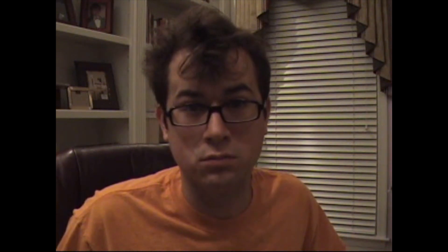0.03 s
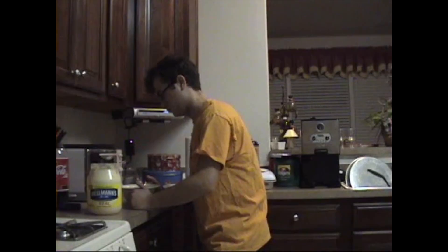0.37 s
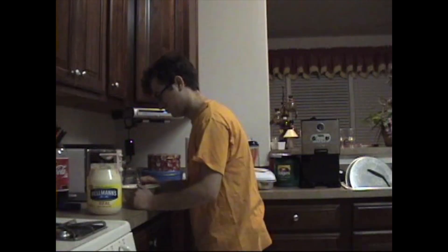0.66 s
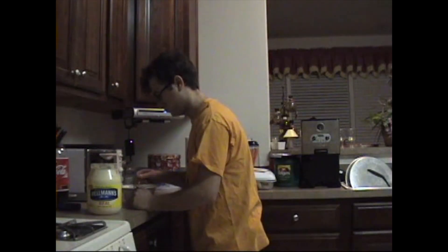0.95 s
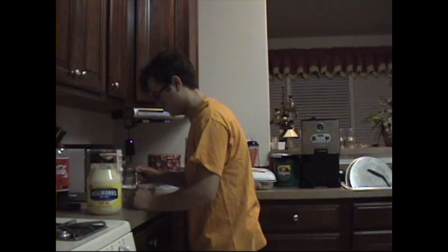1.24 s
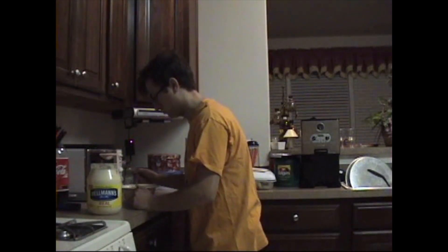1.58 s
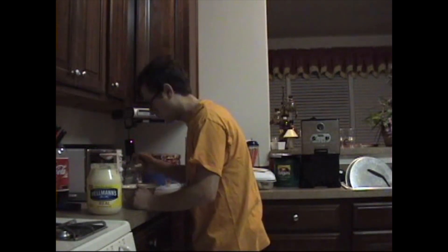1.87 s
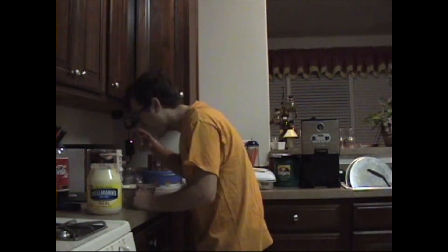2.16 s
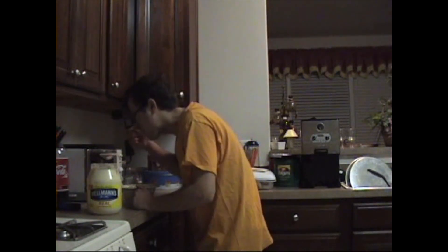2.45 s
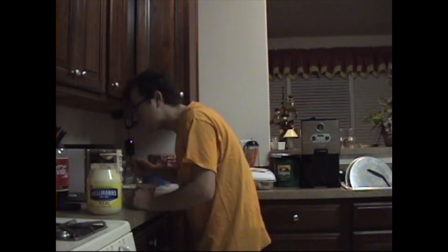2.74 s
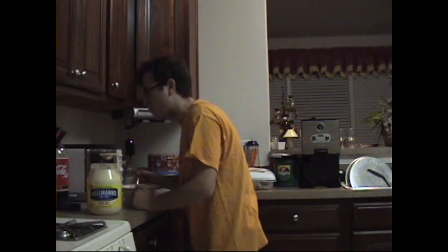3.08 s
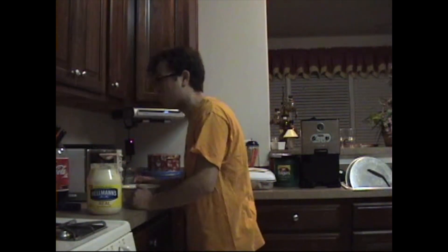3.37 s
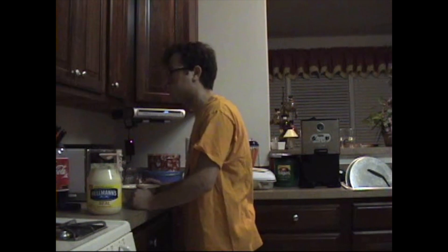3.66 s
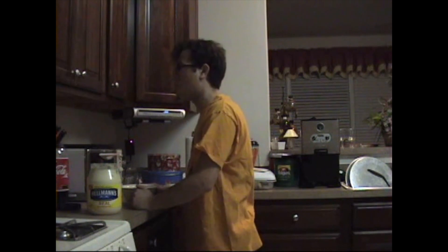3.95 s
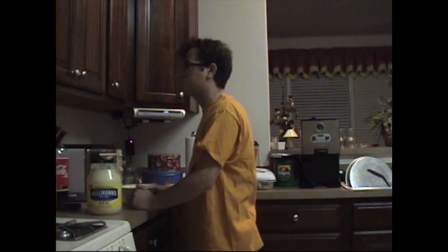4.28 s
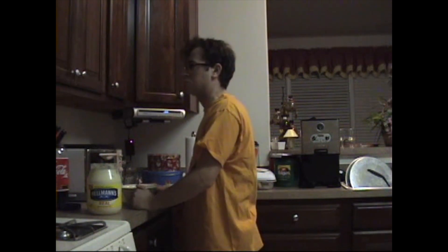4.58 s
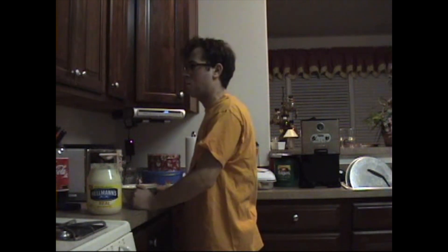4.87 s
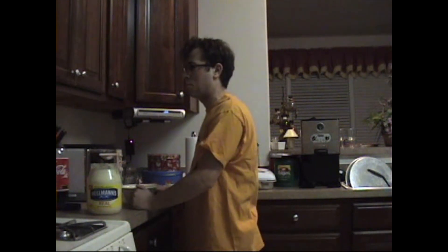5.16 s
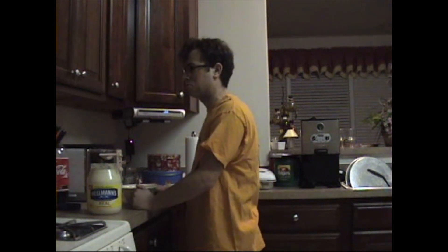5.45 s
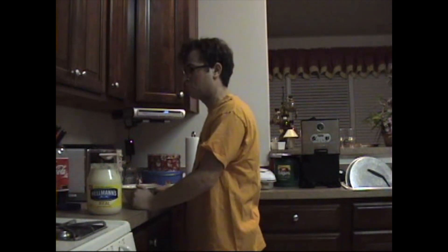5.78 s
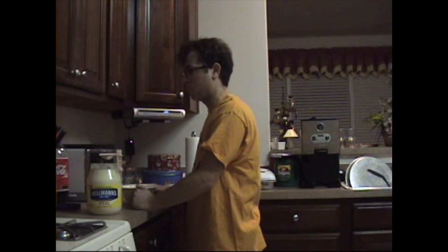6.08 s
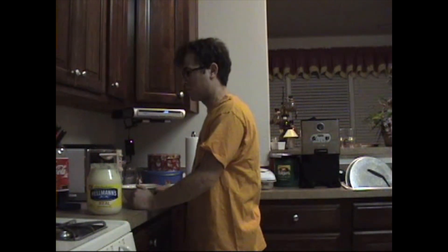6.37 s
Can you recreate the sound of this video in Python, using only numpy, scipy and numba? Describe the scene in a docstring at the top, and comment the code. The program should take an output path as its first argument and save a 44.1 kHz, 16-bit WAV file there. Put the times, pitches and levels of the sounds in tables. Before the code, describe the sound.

Someone bumps a bowl down, stirs and tastes with a spoon, lets it clink against the china and quietly smacks their lips.

```python
"""A small kitchen, close to the counter. A china bowl is bumped down with a hollow, booming thud.
A metal spoon sticks and slips through the mixture, squeaking on the glaze. It slides between the lips,
clicks on the teeth, scrapes in the bowl again and drops rattling against the rim.
Lips smack and something ticks once. Behind it all, a soft room rumble with an appliance drone
swells after each sound, as a noise suppressor opens and slowly closes."""
import sys
import numpy as np
from scipy import signal
from scipy.fft import rfft, irfft
from scipy.io import wavfile
from scipy.ndimage import uniform_filter1d
from numba import njit

SR = 44100
rng = np.random.default_rng(int(sys.argv[2]) if len(sys.argv) > 2 else 0)


def to_wav(s):
    """Save 16-bit WAV."""
    ch = np.atleast_2d(s).T  # columns
    pcm = np.round(np.clip(ch, -1, 1) * 32767)  # PCM
    wavfile.write(sys.argv[1], SR, pcm.astype(np.int16))


N = 287708
TIME = np.arange(N) / SR
SIDE = np.array([[1], [-1]])  # stereo width: added on the left, subtracted on the right

# two faint, dull thumps where the scene changes from the still, humming air, then the bowl's blows on the
# counter: # (time [s], relative level [dB])
DULL_BUMPS = [(0.315, -49), (0.345, -49), (0.9101, -6), (0.9125, 1.5), (0.9165, -2), (0.923, -2),
              (0.940, -20)]
# cupboard boom, longest in the hollow middle: (low edge [Hz], high edge [Hz], relative level [dB], t60 [s])
CUPBOARD_BOOM = [(130, 420, -26, .37), (430, 640, -26, .42), (680, 1060, -24.5, .31),
                 (1100, 1900, -21, .22)]
# EQ curve of the thud: (frequency [Hz], relative gain [dB])
THUD_EQ = [(40, -29), (100, -17), (155, -4.5), (240, -6), (400, 3), (520, 0), (720, -.5), (1000, -2.5),
           (1300, -13.5), (1800, -17.5), (2200, -27), (2850, -28), (3300, -55), (6000, -76)]
# low, hollow tones ringing in the thud: (frequency [Hz], relative level [dB], t60 [s])
THUD_TONES = [(149, -2.5, .27), (285, -11, .32), (316, -5, .33), (392, 2.5, .31), (418, -6, .32),
              (518, -7, .35), (556, -3, .42), (690, -6, .25), (786, -15, .3), (843, -11, .3),
              (929, -10, .31), (985, -12, .31), (1055, -16, .31)]
def thuds():
    """Two faint thumps as the scene changes, then the bowl rocks onto its foot: dull blows, a boom and low,
    hollow tones."""
    tones_start_s, at_rest_s, swell_cycles = 0.9135, 1.08, 6
    times, db = np.transpose(DULL_BUMPS)
    blows = bursts(times, db - 10, t60=.028) * rng.standard_normal(N)
    boom = sum(band(bursts(times, db + boom_db, t60) * rng.standard_normal(N), low, high, order=6)
               for low, high, boom_db, t60 in CUPBOARD_BOOM)
    out, t = colour(blows + boom, THUD_EQ), TIME[:SR]
    for tone in THUD_TONES:
        swell = 1 - fade(t, t60=swell_cycles / tone[0])
        add(out, tones_start_s, amp(-23.7) * ringing([tone], t) * swell)
    choke = amp(-170 * np.maximum(TIME - at_rest_s, 0))
    return band(out * choke, 62, 3000, order=5)


STROKE_ATTACK_S = .022
# spoon strokes: (start [s], length [s], level [dB], edge bite on china [dB], squeak [Hz] or 0 for none)
SPOON_STROKES = [(0.797, 0.043, -66.5, 0.5, 0), (0.915, 0.023, -65, -1, 0), (0.98, .1, -73, -10, 0),
                 (1.121, .04, -57, -4, 0), (1.215, .07, -56, -3.5, 0), (1.297, .05, -51.5, -14, 0),
                 (1.355, .065, -50, -14, 6478), (1.45, .05, -50, -4, 5901), (1.54, .04, -65, 1, 6480),
                 (1.585, .026, -51, -21, 8100), (1.63, .04, -60, -20, 11000),
                 (1.673, .055, -46.5, -15, 8297), (1.747, 0.022, -51.5, -3, 6398), (1.81, .02, -68, 1, 0),
                 (1.90, .025, -66.5, -5, 0), (1.96, .04, -76, 6, 0), (2.16, .05, -77, 1, 0),
                 (2.57, .025, -51, -2, 0), (3.115, .045, -35.5, -3, 0), (3.18, .04, -48, -5, 0),
                 (3.275, .1, -49.5, -5, 8799.5), (3.40, .06, -52, 8, 0), (3.556, 0.03, -75, 14, 6300)]
# EQ curve of the scraping hiss: (frequency [Hz], relative gain [dB])
SCRAPE_EQ = [(600, -16), (1400, -12), (2500, -12.5), (3600, -16), (4500, -11), (6000, -1), (8300, 1.5),
             (10500, -5.5), (12500, -10), (14000, -21)]
def spoon_scrape():
    """The spoon sticks and slips over the glaze; the slips sing in spoon and bowl."""
    glide_bite_db = -28  # a stroke with this little bite glides flat and adds a fine, high hiss
    flat_power, edge_power, glide_power = 0, 0, 0
    for start, length, db, bite_db, _ in SPOON_STROKES:
        power = (amp(db) * stroke_pressure(start, length)) ** 2
        flat_power += power
        edge_power += power * amp(bite_db) ** 2
        glide_power += power * np.clip(bite_db / glide_bite_db, 0, 1) ** 3
    chatter = amp(1.4 * flutter(N, rate_hz=130))
    slips = grit(spread_db=3) * chatter
    edge = slips * np.sqrt(edge_power)  # only the bare edge reaches the china
    hiss = colour(slips * np.sqrt(flat_power), SCRAPE_EQ)
    bite = colour(edge, [(200, -23.5), (1200, -15), (2400, -10.5), (4200, -2.5), (6000, 5),
                         (9000, -13.5), (14000, -28)])
    glide = amp(-1) * unit(band(slips, 7500, 12000, order=2)) * np.sqrt(glide_power)
    rasp = moving_contact(hiss + bite + glide, patchy_db=3.6)
    steel = resonate(hiss, SPOON_MODES, damping_t60=.18)
    china = resonate(band(edge, 2600, 14000, order=2), BOWL_MODES, damping_t60=.23)
    return band(amp(-1) * rasp + amp(-15.5) * steel + amp(-12.5) * china, 300, 13000, order=2)


def stroke_pressure(start, length):
    """One stroke presses in, holds and lets go; the spoon drags on faintly through the mixture."""
    attack = np.clip((TIME - start) / STROKE_ATTACK_S, 0, 1)
    after = np.maximum(TIME - start - length, 0)
    drag = amp(-24.5) * fade(after, t60=.65)
    return attack * np.maximum(fade(after, t60=.22), drag)


def moving_contact(x, patchy_db):
    """As the contact point moves, narrow resonances come and go for some tens of milliseconds."""
    *_, frames = signal.stft(x, nperseg=512)
    patches = uniform_filter1d(rng.standard_normal(frames.shape), size=3, axis=0)
    patches = uniform_filter1d(patches, size=12, axis=1)
    return signal.istft(frames * unit(amp(patchy_db * unit(patches))))[1][:N]


def spoon_squeaks():
    """In some strokes the slips lock into a thin whistle that swells and fades."""
    out = np.zeros(N)
    for start, length, db, bite_db, hz in SPOON_STROKES:
        if hz:
            size = int((length + STROKE_ATTACK_S) * SR)
            strength = amp(db + 1.5) * np.hypot(1, amp(bite_db))
            whistle = wavering(hz, spread_hz=150, size=SR // 4)[:size]
            add(out, start, strength * np.hanning(size) * whistle)
    return out


# the spoon touches the bowl: (time [s], ring level [dB], crack level [dB])
BOWL_TOUCHES = [(0.562, -85, -76), (1.484, -53, -68), (1.850, -71, -60), (1.902, -74, -68),
                (2.123, -72, -69), (3.128, -44, -54), (3.143, -40, -49), (3.205, -54, -66),
                (3.384, -34, -56.5), (3.391, -27, -43), (3.395, -21, -29)]
# china modes, with a beating cluster near 3.6 kHz: (frequency [Hz], relative level [dB], t60 [s])
BOWL_MODES = [(1345, -16, .27), (1373, -5, .29), (3583, -10, .18), (3623, 1, .24), (3653.6, -10, .25),
              (3711, -12, .16), (4194, -16, .25), (5835, -9, .22), (6305, -13, .33), (8660, -13, .17),
              (9382, -18, .21), (10455, -14, .14), (11942, -15, .14), (13242, -14, .11), (1915, -25, .3),
              (2600, -25, .3), (4950, -22, .22), (6400, -16, .22), (7740, -22, .18), (8540, -16, .17),
              (11200, -23, .15)]
def bowl_clinks():
    """The china rings as the spoon touches it, then drops on the rim."""
    contacts = BOWL_TOUCHES + rim_bounces(count=6)
    china = strike(contacts, BOWL_MODES, crack_t60=.11, push_s=.0025, buzz=.45, sing_db=-4)
    return china + counter_knock(contacts)


def rim_bounces(count):
    """The dropped spoon rattles, each bounce weaker and after a longer gap than the last."""
    drop_s, first_gap_s, gap_growth = 3.407, .0105, 1.27
    bounce = np.arange(count)
    gaps = first_gap_s * gap_growth ** bounce
    ring_db, crack_db = -19 - 3.1 * bounce, -27.5 - 5 * bounce
    return list(zip(drop_s + np.cumsum(gaps) - gaps, ring_db, crack_db))


# EQ curve of the knock under the bowl: (frequency [Hz], relative gain [dB])
KNOCK_EQ = [(150, -25), (450, 0), (850, -17), (2000, -35)]
def counter_knock(contacts):
    """Hard drops of the spoon push the bowl against the counter; light touches hardly do."""
    times, _, crack_db = np.transpose(contacts)
    knock_db = crack_db - 11 + .8 * (crack_db - crack_db.max())
    return colour(rng.standard_normal(N) * bursts(times, knock_db, t60=.12), KNOCK_EQ)


# the spoon catches: (time [s], ring level [dB], crack level [dB])
SPOON_CATCHES = [(1.592, -70, -51), (2.493, -68, -60), (2.582, -41, -51), (2.592, -38.5, -47),
                 (3.117, -40, -58), (3.136, -36, -51), (3.163, -41, -56)]
# steel spoon modes: (frequency [Hz], relative level [dB], t60 [s])
SPOON_MODES = [(2950, -11, .06), (3600, -4, .06), (3850, -6, .06), (4180, -.5, 0.115), (4750, -11, .06),
               (5480, -17, 0.11), (6470, -5.5, 0.16), (7620, -6.5, 0.17), (7850, -10.5, 0.14),
               (9300, -13, .18), (10950, -11, 0.2), (11820, -16, 0.1)]
def spoon_taps():
    """The steel gives a short, bright ring as it catches on bowl or teeth."""
    return strike(SPOON_CATCHES, SPOON_MODES, crack_t60=.028, push_s=.004, buzz=.45, sing_db=-6)


# EQ curve of the hard steel-on-china transient: (frequency [Hz], relative gain [dB])
CRACK_EQ = [(150, -24), (850, -11), (1400, -1), (2400, 0), (4000, 0), (6300, -1), (9000, 2), (13000, -4),
            (15000, -18)]
def strike(contacts, modes, crack_t60, push_s, buzz, sing_db):
    """Each contact rasps and pushes the ring to a new level; the loose spoon buzzes on every mode."""
    times, ring_db, crack_db = np.transpose(contacts)
    out, t, middle_hz = np.zeros(N), TIME[:SR // 3], 3600
    chatter = flutter((len(modes), 2 * len(t)), rate_hz=200)
    for at, gap, db in zip(times, np.diff(times, append=N / SR), ring_db):
        held = np.minimum(t / push_s, 1) * np.clip(1 - (t - gap) / push_s, 0, 1)  # until the next contact
        size, first = min(np.count_nonzero(held) + 1, len(t)), int(at * SR)
        for (hz, mode_db, t60), shake in zip(modes, chatter):
            # glancing touches mostly ring the modes of the middle range
            octaves = np.log2(hz / middle_hz)
            glancing_db = (db - ring_db.max()) * max(.2 * octaves, -.4 * octaves)
            rough = 1 + buzz * (hz / middle_hz) ** .4 * shake[first % len(t):][:size]
            ring = ringing([(hz, db + mode_db + glancing_db, t60)], t[:size], start=first / SR)
            add(out, at, held[:size] * rough * ring)
    rasp = grit(spread_db=3) * bursts(times, crack_db, crack_t60)
    singing = amp(sing_db) * resonate(band(rasp, 4000, 15000, order=1), modes, damping_t60=.03)
    return band(out + colour(rasp, CRACK_EQ) + singing, 250, 16000, order=2)


# close, beating modes of spoon on teeth: (frequency [Hz], relative level [dB], t60 [s])
TEETH_MODES = [(3245, -5, .13), (3320, -2, .18), (3375, -5, .17), (3410, 0, .19), (3480, -7, .14),
               (8400, -8, .1), (9400, -8, .12), (11050, -5, .12)]
def teeth_click():
    """The spoon clicks on the teeth: a bright crack and a rough, beating ring."""
    out, t = np.zeros(N), TIME[:SR // 4]
    attack = 1 - fade(t, t60=.014)  # the lips cushion the contact
    ring = ringing(TEETH_MODES, t) * attack
    buzz = 1 + .35 * flutter(len(t), rate_hz=300)
    crack = band(grit(spread_db=2)[:len(t)] * fade(t, t60=.05) * attack, 5500, 12500, order=2)
    add(out, at=2.3935, sound=amp(-31.5) * buzz * ring / np.abs(ring).max() + amp(-31) * crack)
    return out


# pulls of the spoon between the lips: (start [s], swell [s], level [dB])
LIP_PULLS = [(2.33, .032, -53), (2.368, .012, -52), (2.392, .012, -51), (2.43, .035, -56),
             (2.484, .012, -56), (2.53, .04, -56.5)]
# EQ curve of the lip friction: (frequency [Hz], relative gain [dB])
SLIDE_EQ = [(120, -34), (500, -12), (1100, -2), (2000, -15), (5500, -12), (6700, 1), (9500, 0), (12500, -5),
            (14500, -17)]
def lip_slide():
    """Friction on the lips swells and sings in the spoon's upper modes; a thin whistle rises at first."""
    force = np.zeros(N)
    for start, swell, db in LIP_PULLS:
        release = fade(np.maximum(TIME - start - swell, 0), t60=.23)
        force += amp(db) * np.clip((TIME - start) / swell, 0, 1) * release
    slips = force * grit(spread_db=3) * amp(2.2 * flutter(N, rate_hz=130))
    singing = resonate(band(slips, 6600, 14000, order=3), SPOON_MODES, damping_t60=.1)
    out = colour(slips, SLIDE_EQ) + amp(-1) * singing
    t = TIME[:int(.052 * SR)]
    whistle = wavering(hz=7550 + 9000 * t, spread_hz=90, size=len(t))
    add(out, at=2.328, sound=amp(-49) * np.sqrt(np.hanning(len(t))) * whistle)
    return out


# lip and tongue smacks: (time [s], length [s], ring level [dB], mouth cavity [Hz], crackle level [dB])
LIP_SMACKS = [(3.592, .02, -45, 2260, -54), (3.594, 0, -52, 4230, -69), (4.187, 0, -45, 5746, -72),
              (4.19, 0, -60, 4600, -70), (4.264, .035, -42, 2255, -58), (4.27, .07, -80, 9000, -74),
              (4.320, .02, -42.5, 2187, -57), (4.35, .06, -56, 2173, -64), (5.0695, 0, -47, 5950, -62),
              (5.070, 0, -59, 2200, -68), (5.185, 0, -62, 5950, -74), (5.215, 0, -68, 8900, -67),
              (5.252, 0, -62, 7700, -69), (5.306, 0, -52, 9250, -54), (5.309, 0, -46, 5790, -58),
              (5.3095, 0, -52, 2170, -60), (5.33, .02, -62, 9400, -64), (5.356, 0, -50, 7420, -66),
              (5.356, 0, -50, 5800, -65), (5.373, 0, -47, 3320, -58), (5.375, .02, -60, 5790, -66),
              (5.374, .02, -58, 480, -58), (5.374, 0, -51, 7400, -72), (5.374, .02, -48, 2066, -53),
              (5.46, 0, -66, 2200, -67), (5.54, .03, -70, 3300, -71), (6.268, .06, -69, 2200, -72)]
def lip_smacks():
    """Runs of wet clicks: each rings the mouth cavity at a wavering pitch and crackles around it."""
    click_gap_s, scatter_db, max_clicks = .0137, .7, 8
    out, t = np.zeros(N), TIME[:SR // 2]
    attack = 1 - fade(t, t60=.008)
    ring = fade(t, t60=.048) * attack
    fizz = (fade(t, t60=.055) + amp(-21) * fade(t, t60=.7)) * attack  # a soft crackle trails each click
    grains = grit(spread_db=3.2)
    for start, length, db, hz, crackle_db in LIP_SMACKS:
        late, louder = rng.standard_normal((2, max_clicks))
        ring_power, crackle_power = np.zeros((2, N))
        for k in range(min(1 + int(length / click_gap_s), max_clicks)):
            after = max(click_gap_s * (k + .13 * late[k] * (k > 0)), 0)
            accent_db = scatter_db * louder[k]
            add(ring_power, after, (amp(db + accent_db) * ring) ** 2)
            add(crackle_power, after, (amp(crackle_db + accent_db) * fizz) ** 2)
        wet_grains = np.roll(grains, -int(start * SR))[:len(t)]
        crackle = unit(band(wet_grains, .45 * hz, min(1.65 * hz, 13000), order=4))
        cavity = wavering(hz, spread_hz=130, size=len(t))
        add(out, start, np.sqrt(ring_power[:len(t)]) * cavity + np.sqrt(crackle_power[:len(t)]) * crackle)
    return band(out, 320, 12500, order=3)


# EQ curve of the tick: (frequency [Hz], relative gain [dB])
TICK_EQ = [(150, -22), (400, -7.5), (1100, 2), (1500, -11), (2000, -28), (2900, -25), (3500, 1), (4600, -5),
           (7500, -10), (9500, -4), (12000, -18), (14000, -35)]
def tick(at=5.7222, db=-33):
    """One sharp tick of noise with a short, quieter tail."""
    envelope = bursts([at], [db], t60=.018) + bursts([at], [db - 14], t60=.09)
    return band(colour(rng.standard_normal(N) * envelope, TICK_EQ), 300, 12500, order=3)


# EQ curve of the room rumble: (frequency [Hz], relative gain [dB])
RUMBLE_EQ = [(18, -60), (30, -36.5), (53, -23), (85, -29.5), (107, -14), (139, -20.5), (158, -7.5),
             (240, -3), (267, -6), (437, -7.5), (645, -13), (1500, -21.5), (2630, -27.5), (8470, -38.5),
             (11300, -42.5), (15000, -56)]
# EQ curve of the stiller opening air: (frequency [Hz], relative gain [dB])
STILL_AIR_EQ = [(30, -30), (80, -14), (120, -1), (220, 0), (400, -3), (500, -8), (880, -7), (1030, -2),
                (1300, -12), (2800, -15), (8000, -27), (15000, -42)]
# faint opening hum: (frequency [Hz], rms level [dB])
HUM, HUM_END_S = [(118.4, -78), (403.7, -81), (769.8, -80)], 0.28
def room_tone():
    """Still air with a brief hum crossfades into a soft rumble, nearly mono in the bass."""
    mid, side = (colour(rng.standard_normal(N), RUMBLE_EQ) for _ in range(2))
    width = SIDE * (amp(-18) * side + amp(-3.5) * band(side, 850, 9000, order=1))
    rumble = amp(-67.2) * (mid + appliance_drone() + width)
    hum = sum(amp(db) * np.sqrt(2) * np.sin(2 * np.pi * hz * TIME) for hz, db in HUM)
    air = amp(-73) * (colour(rng.standard_normal(N), STILL_AIR_EQ) + amp(-3) * width)
    opening = np.clip((HUM_END_S - TIME) / .013, 0, 1)
    return rumble * (1 - opening) + (hum + air) * opening


# appliance tones: (frequency [Hz], level against the rumble [dB], pitch wander [Hz])
APPLIANCE_TONES = [(210, -12, 4), (240.5, -9, 3), (441, -20, 5), (2638, -27, 8), (3284, -33, 10)]
def appliance_drone():
    """The faint, slightly unsteady tones of a running appliance."""
    return sum(amp(db) * np.sqrt(2) * wavering(hz, wander_hz, N, rate_hz=40)
               for hz, db, wander_hz in APPLIANCE_TONES)


def noise_suppressor(sound, threshold_db=-60, range_db=10.6, open_s=.19, close_s=.4):
    """Gain for the room tone: it opens while the sound is over the threshold and closes slowly after."""
    power = np.abs(uniform_filter1d(sound.mean(axis=0) ** 2, SR // 100))
    over = power / (power + amp(threshold_db) ** 2)
    return amp(range_db * follow(over, 1 / (open_s * SR), 1 / (close_s * SR)))


def kitchen(x, wet_db, side_db, t60, side_from_hz):
    """Direct sound plus a short, diffuse room tail, with stereo width mainly in the mids."""
    t = TIME[:SR // 2]
    noise = rng.standard_normal((2, len(t)))
    body = band(noise, 110, 3800, order=2) * fade(t, t60)
    treble = band(noise, 4500, 21000, order=2) * fade(t, t60 / 2)  # curtains and clothes soak up highs
    tails = (body + treble) * (1 - fade(t, t60=.011))
    mid, side = (convolve(x, tail) for tail in tails)
    return x + amp(wet_db) * mid + amp(side_db) * band(side, side_from_hz, 5500, order=1) * SIDE


def amp(db):
    """Decibels to gain."""
    return 10 ** (np.asarray(db) / 20)


def unit(x):
    """Scale to rms 1."""
    return x / np.sqrt(np.mean(x ** 2))


def fade(t, t60):
    """Exponential decay, 60 dB down after t60."""
    return np.exp(-np.log(1000) * t / t60)


def add(out, at, sound):
    """Mix a sound in at a time in seconds."""
    i = int(at * SR)
    out[i:i + len(sound)] += sound[:N - i]


def band(x, low_hz, high_hz, order):
    """Butterworth band-pass."""
    return signal.sosfilt(signal.butter(order, [low_hz, high_hz], "bandpass", fs=SR, output="sos"), x)


def convolve(x, response):
    """Play x through an impulse response scaled to unit energy."""
    return signal.oaconvolve(x, response / np.linalg.norm(response))[:N]


def colour(x, curve):
    """Minimum-phase EQ of unit power that follows a curve of (frequency [Hz], relative gain [dB])."""
    size = 4096
    hz, db = np.transpose(curve)
    bin_hz = np.arange(size // 2 + 1) * SR / size
    gain = amp(np.interp(np.log(bin_hz + 1), np.log(hz), db))
    cepstrum = irfft(np.log(gain))
    cepstrum[1:size // 2] *= 2
    cepstrum[size // 2 + 1:] = 0
    return convolve(x, irfft(np.exp(rfft(cepstrum))))


def grit(spread_db):
    """Dense tiny slips of uneven size, rms 1."""
    return unit(rng.standard_normal(N) * amp(spread_db * np.minimum(rng.exponential(size=N), 5)))


def flutter(shape, rate_hz):
    """Random modulation, mostly slower than rate_hz, rms 1."""
    return unit(uniform_filter1d(rng.standard_normal(shape), SR // rate_hz))


def wavering(hz, spread_hz, size, rate_hz=700):
    """A tone whose pitch jitters: a resonance kept going by an uneven push."""
    return np.sin(2 * np.pi * np.cumsum(hz + spread_hz * flutter(size, rate_hz)) / SR)


def bursts(times, levels_db, t60):
    """An envelope that jumps at each contact and dies away."""
    power, t = np.zeros(N), TIME[:SR]
    for at, db in zip(times, levels_db):
        add(power, at, (amp(db) * fade(t, t60)) ** 2)
    return np.sqrt(power)


def ringing(modes, t, start=0):
    """Free vibration of a struck object; the phases run on from the time start."""
    return sum(amp(db) * np.sin(2 * np.pi * hz * (start + t)) * fade(t, t60) for hz, db, t60 in modes)


def resonate(force, modes, damping_t60):
    """An object driven by a rough force and damped by the contact."""
    t = TIME[:SR // 4]
    return convolve(force, ringing(modes, t) * fade(t, damping_t60))


@njit
def follow(x, rise, fall):
    """Envelope follower: it chases x at one rate upward and another downward."""
    out, level = np.empty(len(x)), 0.
    for i in range(len(x)):
        level += (x[i] - level) * (rise if x[i] > level else fall)
        out[i] = level
    return out


def scene():
    """Four groups, each with its own room send, over room tone that swells behind them."""
    china, steel = bowl_clinks(), spoon_taps()
    foley = kitchen(thuds(), wet_db=-17, side_db=-18, t60=.18, side_from_hz=180)
    foley += kitchen(china, wet_db=-13.5, side_db=-6.5, t60=.24, side_from_hz=1700)
    small_sounds = steel + teeth_click() + spoon_scrape() + lip_slide() + spoon_squeaks() + tick()
    foley += kitchen(small_sounds, wet_db=-12.5, side_db=-9, t60=.16, side_from_hz=450)
    foley += kitchen(lip_smacks(), wet_db=-8.5, side_db=-9, t60=.3, side_from_hz=450)
    return foley + noise_suppressor(foley) * room_tone()


def record(dry):
    """A steep low-pass cuts the very top."""
    top_hz = 14400
    return signal.sosfilt(signal.ellip(8, .2, 70, top_hz, fs=SR, output="sos"), dry)


dry = scene()
out = record(dry)
to_wav(out)
```